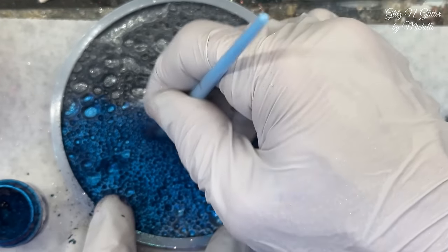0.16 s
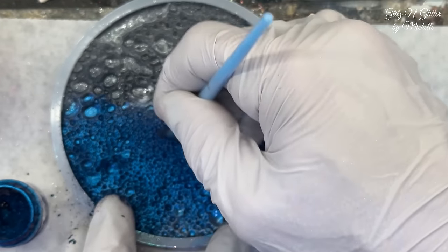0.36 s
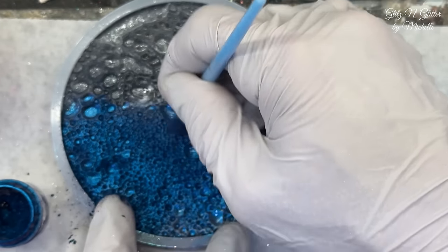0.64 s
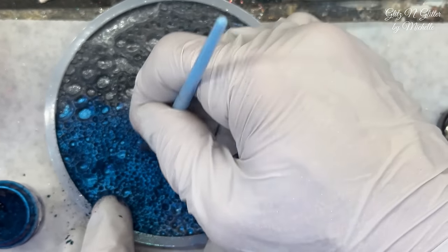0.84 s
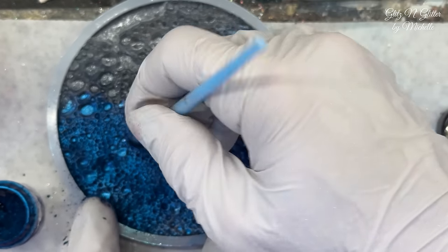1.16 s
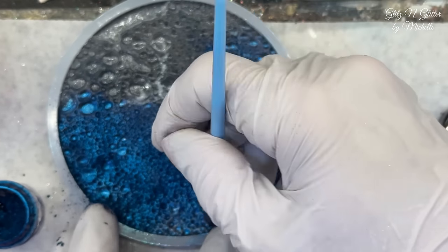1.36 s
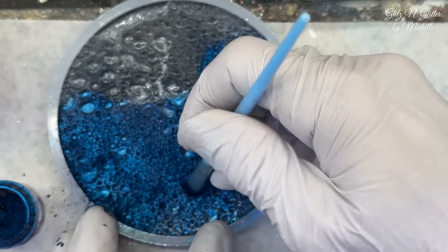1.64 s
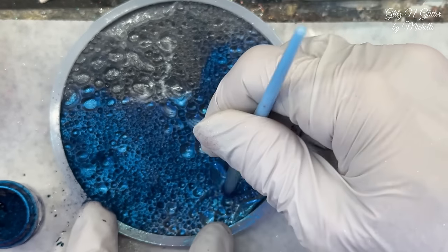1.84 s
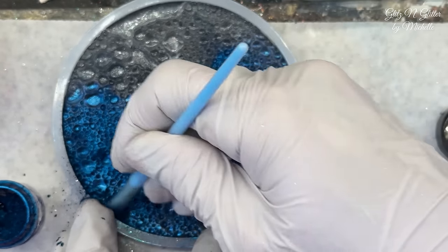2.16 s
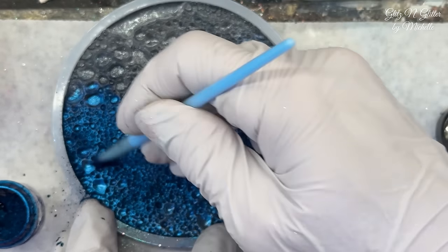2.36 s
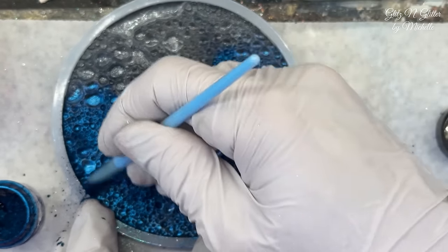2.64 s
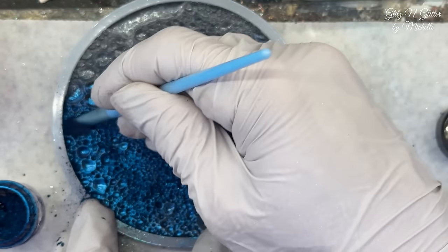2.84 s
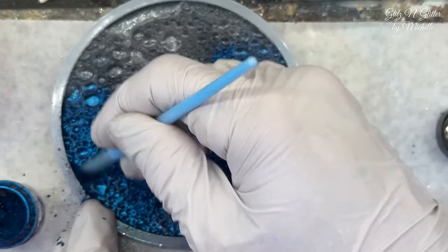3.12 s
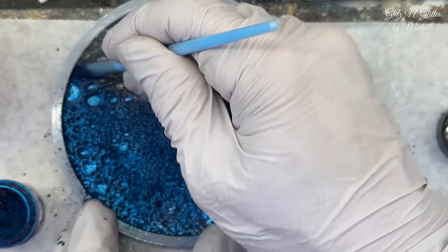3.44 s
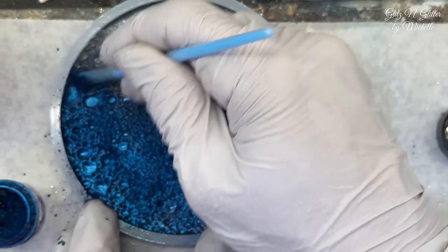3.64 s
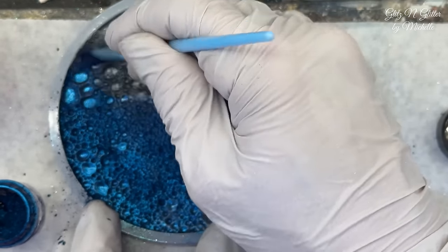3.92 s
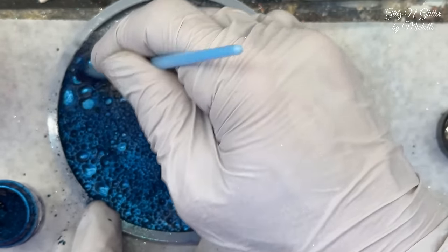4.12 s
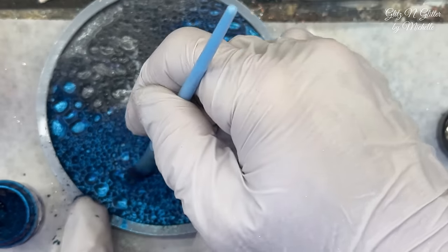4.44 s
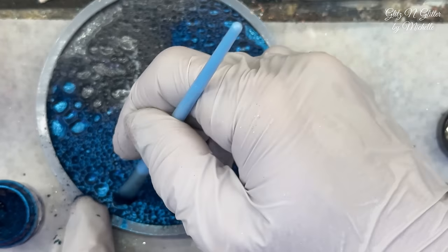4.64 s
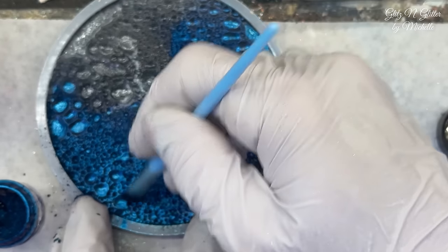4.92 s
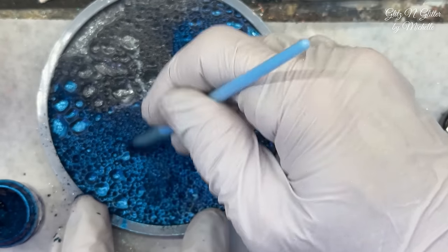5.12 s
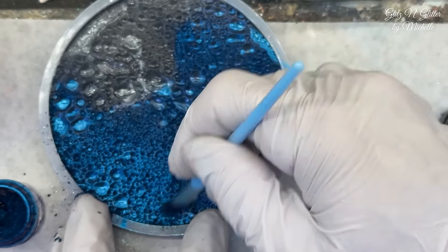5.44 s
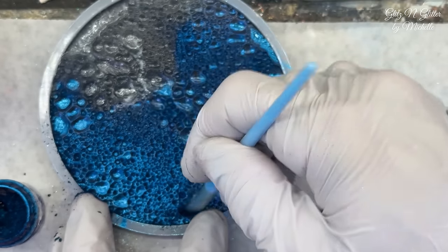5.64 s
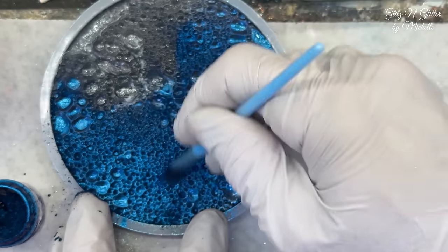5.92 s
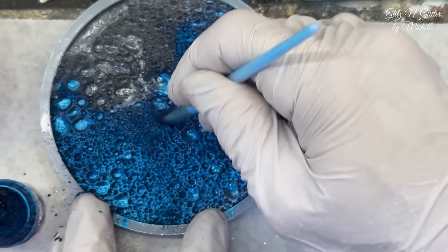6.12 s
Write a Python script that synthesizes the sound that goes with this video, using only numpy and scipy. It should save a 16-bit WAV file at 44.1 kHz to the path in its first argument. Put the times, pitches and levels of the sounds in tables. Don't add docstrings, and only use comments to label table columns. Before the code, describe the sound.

A small brush scrubs dry powder over a bumpy hard disc in quick hissing rubs, with tiny clicks, soft thumps and short pauses.

```python
import sys
import numpy as np
from scipy import signal
from scipy.fft import rfft, irfft
from scipy.io import wavfile
from scipy.ndimage import uniform_filter1d

SR = 44100
rng = np.random.default_rng(int(sys.argv[2]) if len(sys.argv) > 2 else 0)


def int16_out(signal):
    q = np.round(np.clip(np.atleast_2d(signal).T, -1, 1) * 32767)
    wavfile.write(sys.argv[1], SR, q.astype(np.int16))


def magnitude_from_level(level_db):
    exponent = np.asarray(level_db, float) / 20
    return 10 ** exponent


N = 276948


def evened(x):
    return x / np.sqrt(np.mean(x ** 2) + 1e-20)


def read(points):
    hz, value = np.transpose(points)
    return np.interp(np.log(np.fft.rfftfreq(N, 1 / SR) + 1), np.log(hz + 1), value)


def columns(rows):
    s, *values = np.transpose(rows)
    return [np.interp(np.arange(N) / SR, s, v) for v in values]


def colour(x, points):
    return evened(irfft(rfft(x) * magnitude_from_level(read(points)), N))


def ring(x, modes):
    out = 0
    for k, (hz, width_hz, db) in enumerate(modes):
        pole = np.exp((-np.pi * abs(width_hz) + 2j * np.pi * hz) / SR)
        mode = signal.lfilter([1 - abs(pole)], [1, -pole], x).real
        out = out + (-1) ** k * magnitude_from_level(db) * mode
    return evened(out)


def drift(seconds):
    size = max(int(seconds * SR), 2)
    return evened(uniform_filter1d(uniform_filter1d(rng.standard_normal(N), size), size))


def swells(start_s, length_s, peak, db, hold, curve):
    power = np.zeros(N)
    for s, span_s, top, level_db in np.broadcast(start_s, length_s, np.clip(peak, .05, .95), db):
        at = np.arange(max(round(s * SR), 0), min(round((s + span_s) * SR), N))
        u = (at / SR - s) / span_s
        effort = np.clip(hold * np.minimum(u / top, (1 - u) / (1 - top)), 0, 1)
        power[at] += (magnitude_from_level(level_db) * effort ** curve) ** 2
    return power


def ports(pair, same, lean_db=0):
    # frequency in Hz, lead of the left port in radians
    lead = [(4000, 0), (5700, -.5), (7000, -1.3), (8500, -1.9), (10200, -2.55), (11300, -3.0),
            (12600, -3.3), (13500, -3.75), (16000, -4.8)]
    likeness = np.clip(read(same), -1, 1)
    shared, opposed = rfft(pair) * np.sqrt([(1 + likeness) / 2, (1 - likeness) / 2])
    turn = np.exp(.5j * read(lead)) * magnitude_from_level(lean_db / 2)
    return irfft([(shared + opposed) * turn, (shared - opposed) / turn], N)


def room():
    # frequency in Hz, level in dB
    air_points = [(30, -32), (60, -3), (95, -17.5), (170, -5.5), (300, -12.5), (1200, -24.5), (2350, -29),
                  (3700, -31.5), (6000, -29), (8600, -58), (10600, -22.5), (13000, -32), (15700, -35)]
    # frequency in Hz, waver width in Hz, level in dB
    hum = [(58, 4, -57.5), (120.6, 0.8, -54), (6460, 3.3, -84), (12600, 30, -93.5)]
    waver_depths_db = [2.5, 1.2, 4, 2]
    air = magnitude_from_level(-64.5 + drift(0.075)) * colour(rng.standard_normal((2, N)), air_points)
    for (hz, width_hz, db), waver_db in zip(hum, waver_depths_db):
        turns = np.cumsum(hz + width_hz * drift(3 / width_hz ** .5 / 20)) / SR
        air[0] += magnitude_from_level(db + waver_db * drift(0.048)) * np.sin(2 * np.pi * turns)
    return air


def whine():
    mode = [(6465, 110, 0)]
    noise = rng.standard_normal((2, N))
    return magnitude_from_level(-74 + 3.5 * drift(0.038)) * ring(ring(noise, mode), mode)


def patchy(x, patch_db):
    z = signal.stft(x, nperseg=512, noverlap=384)[2]
    field = rng.standard_normal(z.shape[:0:-1])
    field = uniform_filter1d(uniform_filter1d(field, 4, 0), 12, 1)
    return signal.istft(z * magnitude_from_level(patch_db * evened(field).T), nperseg=512, noverlap=384)[1][:, :N]


def brush(ticks_per_s=4000, clump_db=1.5, slide=2.2):
    # start in seconds, length in seconds, share spent pressing in 0-1, contact in dB, weight
    # on the tray in dB re contact
    strokes = [(-.06, 0.18, 0.85, -42, -17), (0.098, 0.085, 0.4, -53, -7), (0.154, 0.12, 0.02, -45, -18.5),
               (0.202, 0.14, 0.51, -43, -18.5), (0.328, 0.11, 0.45, -47, -15.5), (.4, 0.12, 0.34, -49, -12),
               (0.432, 0.11, 0.63, -43, -20), (0.523, 0.12, 0.47, -45, -8.5),
               (0.62, 0.2, 0.47, -43.5, -18.5), (0.713, 0.15, 0.34, -43, -12.5),
               (0.856, 0.099, 0.7, -47, -31), (0.942, 0.22, 0.13, -47, -14), (1.07, 0.094, 0.6, -61, -28),
               (1.147, .1, 0.93, -46.5, -45), (1.237, 0.075, 0, -53, -30), (1.3, 0.11, 0.69, -49.5, -28),
               (1.392, 0.065, 0.25, -58.5, -19), (1.447, 0.14, 0.43, -55.5, -17),
               (1.593, 0.073, 0.76, -51, -24), (1.653, 0.15, 0.27, -54, -22), (1.744, 0.13, 0.68, -56, -22),
               (1.94, 0.14, 0.4, -55.5, -20), (2.011, 0.078, 0.39, -46.5, -21), (2.051, 0.19, 0.32, -45, -18),
            (2.169, 0.28, 0.058, -47.5, -21), (2.415, 0.1, 0.18, -59.5, -18),
            (2.511, 0.15, 0.59, -44.5, -25), (2.599, 0.14, 0.52, -46, -23), (2.692, 0.058, 0.44, -44, -24),
            (2.746, 0.024, 0.29, -46, -19), (2.769, 0.041, 0.71, -42, -23), (2.804, 0.065, 0.094, -46, -38),
            (2.851, 0.098, 0.26, -56, -32), (2.99, 0.047, 0.43, -58, -29), (3.07, 0.045, 0.22, -52.5, -17),
            (3.105, 0.062, 0.77, -44, -31), (3.168, 0.027, 0.6, -41, -22), (3.206, 0.12, 0.37, -45, -31),
            (3.3, 0.052, 1, -46, -20), (3.349, 0.075, 0.4, -43.5, -33), (3.452, 0.11, 0.97, -53, -28),
            (3.56, 0.072, 0.46, -53.5, -26), (3.615, 0.095, 0.81, -43.5, -36),
            (3.764, 0.081, 0.37, -43, -26), (3.845, 0.082, 0.96, -46.5, -39),
            (3.935, 0.044, 0.5, -44.5, -27), (3.956, 0.063, 0.23, -39, -35),
            (4.031, 0.079, 0.77, -44.5, -39), (4.122, 0.041, .4, -51.5, -32),
            (4.147, 0.065, 0.22, -42, -48), (4.188, 0.078, 0.2, -50.5, -33), (4.23, 0.23, 0.34, -49, -16),
            (4.361, 0.14, 0.59, -58.5, -17), (4.481, 0.057, 0.49, -61.5, -25),
               (4.676, 0.034, 0.56, -61.5, -27), (4.702, 0.11, 0.53, -43, -17),
              (4.805, 0.046, 0.33, -56.5, -27), (4.858, 0.091, 0.62, -68, -12),
              (4.96, 0.038, 0.24, -55, -23), (4.975, 0.12, 0.54, -42.5, -9),
              (5.08, 0.069, 0.11, -57.5, -28), (5.209, 0.032, 0.21, -56, -8),
              (5.22, 0.12, 0.45, -41.5, -9.5), (5.437, 0.056, 0.37, -58, -7.5),
              (5.467, 0.11, 0.44, -42, -16.5), (5.578, 0.052, 0.36, -56.5, -23),
              (5.674, 0.066, 0.23, -53.5, -2), (5.689, 0.12, 0.54, -41.5, -14),
              (5.825, 0.062, 0.3, -46, -17), (5.893, 0.052, 0.35, -54, -25),
              (5.914, 0.14, 0.5, -41.5, -18.5), (6.055, 0.082, 0.54, -40.5, -18),
              (6.148, 0.082, 0.56, -43, -32), (6.224, 0.14, 0.45, -40, -22)]
    # time in seconds, disc ring in dB, bristles laid flat in dB, both re contact
    place = [(0, -2.5, -10), (.75, -1, -6), (1.0, -11, -0.5), (1.3, -11, -5), (1.75, -7.5, 2),
             (2.1, -12, -12), (2.85, -17, -14), (3.3, -18, -12.5), (3.7, -15, -9), (4.08, -20.5, -9),
             (4.2, -3.5, -7), (4.45, -18, 4.5), (4.75, -18, -4.5), (5.05, -12.5, -7), (5.5, -9, -5.5),
             (5.85, -7, -6.5), (6.28, -9, -7.5)]
    # frequency in Hz, level in dB
    fizz = [(3000, -33.5), (7000, -13), (9000, -10), (10600, 0), (13000, -1), (15200, -0.5), (16500, -3.5)]
    # frequency in Hz, level in dB
    body = [(300, -42), (1100, -26.5), (1800, -9), (3850, -10.5), (5000, -4.5), (5800, -4.5), (8000, -9),
            (10000, -10)]
    # frequency in Hz, width in Hz, level in dB re scrape
    rim = (6690, 250, -9.5)
    # frequency in Hz, width in Hz, level in dB
    tray_modes = [(369, 27, 0.5), (555, 270, -10.5), (767, 295, 2), (973, 28, 0), (1112, 39, 2),
                  (1534, 64, 8), (1880, 670, -11.5)]
    # frequency in Hz, width in Hz, level in dB
    disc_modes = [(1549, 160, 9), (1670, 130, -1), (2380, 350, 2.5), (2817, 62, 17), (3052, 420, 0.5)]
    resting_db, trail_s, trail_db = -75, 0.045, -16.5
    press_curve = 1.2
    tick_spread_db = 4.6

    start_s, length_s, peak, db, weight_db = np.transpose(strokes)
    rubbing = swells(start_s, length_s, peak, db, 1.145, 0.61)
    keep = np.exp(-1 / (trail_s * SR))
    trailing = magnitude_from_level(2 * trail_db) * signal.lfilter([1 - keep], [1, -keep], rubbing)
    resting = magnitude_from_level(2 * resting_db)
    contact = np.sqrt(rubbing + trailing + resting)
    bearing = swells(start_s, length_s, peak, db + weight_db + 4.0, 0.79, press_curve)
    weight = np.sqrt(bearing + magnitude_from_level(2 * (resting_db - 8)))
    pressing = np.sqrt(swells(start_s, length_s, peak, db, 0.86, press_curve) + trailing + resting)

    disc_db, flat_db = columns(place)
    happens = rng.random(N) < ticks_per_s / SR
    size = magnitude_from_level(tick_spread_db * np.minimum(rng.exponential(1, N), 4.1)) * happens
    clumps = magnitude_from_level(clump_db * drift(0.0041))
    drive = evened(clumps * (slide + evened(size)) * rng.standard_normal((2, N)))

    tips = contact * magnitude_from_level(2.0) * colour(drive, fizz)
    scrape = colour(drive, body) + magnitude_from_level(rim[2]) * ring(drive, [rim])
    tray = drive * weight * magnitude_from_level(-1.0)
    disc = drive * pressing * magnitude_from_level(disc_db - 4.0)
    rings = np.std(tray) * ring(tray, tray_modes) + np.std(disc) * ring(disc, disc_modes)
    return patchy(tips + contact * magnitude_from_level(flat_db - 3.5) * scrape + rings, 2.8) + hollow(drive)


def table(steady=0.74):
    # start in seconds, length in seconds, shake in dB, upper modes in dB re shake
    pushes = [(-.024, 0.12, -43.5, -21), (0.157, 0.1, -36.5, -17), (0.23, 0.17, -45.5, -11),
              (0.371, 0.094, -38, -14), (0.487, 0.069, -48.5, -5), (0.56, 0.36, -47, -7),
              (0.843, 0.46, -54.5, -4.5), (1.49, 0.23, -54, -5), (2.142, 0.27, -53, 0.5),
              (2.519, 0.059, -49, -18), (2.606, 0.071, -42, -13), (2.685, 0.24, -44.5, -6.5),
              (3.083, 0.054, -34.5, -38), (3.14, 0.25, -39, -8), (3.276, 0.23, -45.5, -1),
              (3.637, 0.099, -39.5, -7.5), (3.81, 0.03, -38.5, -10), (3.958, 0.11, -43.5, -3),
              (4.033, 0.16, -40.5, -20), (4.152, 0.12, -38.5, -34), (4.228, 0.27, -53, -9),
              (4.69, 0.17, -50, 0), (4.966, 0.053, -44, -29), (5.023, 0.093, -54.5, 8),
              (5.205, 0.18, -45.5, -5), (5.437, 0.17, -40.5, -14.5), (5.679, 0.19, -44, -1.5),
              (5.875, 0.24, -41.5, -7.5), (5.982, 0.26, -42.5, -11.5), (6.257, 0.053, -25.5, -18)]
    # start in seconds, peak in dB, ring in Hz, t60 in seconds
    bumps = [(-.02, -6, 65.5, 0.067), (0.174, -22.5, 58, 0.19), (3.077, -41, 72.5, 0.22),
             (2.206, -36, 96, .1), (3.988, -26, 122.8, 0.17), (4.0066, -8, 65, 0.072),
             (4.174, -22, 58, 0.18), (4.968, -26, 54, 0.23), (5.218, -19, 58.6, 0.088),
             (5.683, -25.5, 70, 0.13), (6.252, -20.5, 79, 0.45)]
    # frequency in Hz, width in Hz, level in dB
    low_modes = [(58, 20.9, -0.5), (100, 33.9, -1.5), (113.9, 14.8, -6)]
    # frequency in Hz, width in Hz, level in dB
    upper_modes = [(127.4, 19.8, 7), (163, 77, -10), (204, 32, -32)]
    start_s, length_s, db, upper_db = np.transpose(pushes)
    still = magnitude_from_level(2 * -65)
    shake = np.sqrt(swells(start_s, length_s, 0.23, db - 0.5, 0.97, 0.72) + still)
    upper = np.sqrt(swells(start_s, length_s, 0.54, db + upper_db + 5.5, 0.79, 0.98) + still)
    low = ring(rng.standard_normal(N), low_modes)
    high = ring(rng.standard_normal(N), upper_modes)
    low = evened(low / uniform_filter1d(low ** 2, 1800) ** (steady / 2))
    out = shake * low + upper * high
    for s, peak_db, hz, t60_s in bumps:
        t = np.maximum(np.arange(N) / SR - s, 0)
        swing = (1 - np.exp(-t / 0.015)) * np.sin(2 * np.pi * hz * t)
        out += magnitude_from_level(peak_db - 60 * t / t60_s) * swing
    return signal.sosfilt(signal.butter(3, [38, 260], "bandpass", fs=SR, output="sos"), out)


def hollow(drive):
    # start in seconds, length in seconds, share pressing in 0-1, level in dB, ring in Hz
    loads = [(0.034, 0.094, 0.2, -58.5, 730), (0.245, 0.099, 0.14, -61.5, 750),
             (0.472, 0.087, 0.8, -50, 790), (0.56, 0.067, 0.4, -56, 750), (0.688, 0.072, 0.6, -55, 810),
             (.76, 0.094, 0.15, -56.5, 750), (2.099, 0.16, 0.13, -57.5, 857), (2.58, 0.12, 0.65, -66, 840),
             (2.695, 0.072, 0.1, -56.5, 795), (2.769, 0.046, 0.46, -59, 710), (3.33, .06, .5, -58.5, 1890),
             (3.77, .05, .4, -62, 2100), (3.96, 0.044, .4, -59, 1600), (4.137, .06, .4, -58.5, 1600),
             (.49, .12, 0.4, -55, 2100), (4.735, 0.02, 0.3, -58, 790), (4.966, 0.023, 0.25, -52, 830),
             (5.0, 0.056, 0.24, -50, 746), (5.205, 0.063, 0.3, -59, 830), (5.25, 0.043, 0.8, -50, 750),
             (5.671, 0.028, 0.3, -63, 820), (5.727, 0.056, 0.3, -58, 696), (5.953, 0.092, 0.06, -57, 710),
             (6.074, 0.073, 0.3, -61, 790)]
    out = np.zeros((2, N))
    for s, span_s, top, db, hz in loads:
        at = slice(round(s * SR), round((s + span_s) * SR))
        mode = [(hz, 233, 0)]
        load = np.sqrt(swells([s], span_s, top, db, 0.85, 1)[at])
        out[:, at] += load * ring(ring(drive[:, at], mode), mode)
    return out


def bursts(rows, trim_db, t60_s, from_hz):
    out, t = np.zeros((2, N + 1000)), np.arange(800) / SR
    noise = np.sign(rng.standard_normal((len(rows), 2, len(t)))) * [[1], [.4]]
    for (s, db), burst in zip(rows, noise):
        at = round(s * SR)
        out[:, at:at + len(t)] += magnitude_from_level(db + trim_db - 60 * t / t60_s) * burst
    return signal.lfilter(*signal.butter(2, from_hz, "highpass", fs=SR), out[:, :N])


def clicks():
    # time in seconds, peak in dB
    strikes = [(.1612, -36), (.3633, -37), (1.2123, -46), (1.6138, -36), (1.6564, -22), (2.3597, -45),
               (2.7538, -27.5), (2.7863, -41.5), (2.8112, -28.5), (3.0132, -46), (3.0442, -52),
               (3.1819, -34), (3.7820, -37.5), (3.9596, -35.5), (3.9766, -29), (4.1542, -33), (4.9440, -48),
               (4.9783, -46), (5.2397, -40), (5.4427, -52), (5.7086, -43), (5.9012, -42), (6.0713, -38),
               (6.2534, -36)]
    return bursts(strikes, 2.5, t60_s=.0022, from_hz=6500)


def knocks(hits, tick_db, crack=1.07, breadth=0.27, tick_t60_s=0.003):
    out, t = np.zeros((2, N + 4000)), np.arange(3000) / SR
    noise = rng.standard_normal((len(hits), 2, len(t)))
    for (s, db, hz, t60_s), crackle in zip(hits, noise):
        at = round(s * SR)
        body = np.sin(2 * np.pi * hz * t) + crack * ring(crackle, [(hz, breadth * hz, 0)])
        bright = magnitude_from_level(tick_db - 60 * t / tick_t60_s) * crackle
        out[:, at:at + len(t)] += magnitude_from_level(db - 10.0) * (magnitude_from_level(-60 * t / max(t60_s, .003)) * body + bright)
    return out[:, :N]


def snaps():
    # time in seconds, peak in dB, ring in Hz, t60
    # in seconds
    tufts = [(0.166, -34, 5150, 0.015), (0.4429, -41, 2860, 0.021), (1.2092, -60, 6050, 0.019),
             (1.6146, -39, 2910, 0.031), (1.6565, -41, 1910, 0.026), (1.709, -39, 6150, 0.016),
             (2.1152, -34.5, 2710, 0.015), (2.179, -43, 6500, 0.018), (2.5939, -37.5, 6360, 0.099),
             (2.753, -57, 4530, 0.016), (2.812, -56, 6460, 0.0086), (3.065, -43.5, 2420, 0.015),
             (3.1835, -40, 7140, 0.02), (3.7214, -38.5, 2280, 0.018), (3.782, -40, 5460, 0.01),
             (3.961, -34, 6060, 0.016), (3.9783, -45, 1710, 0.21), (4.136, -42, 2700, 0.065),
             (4.153, -45, 6900, 0.017), (4.181, -34.5, 6400, 0.024), (4.2966, -39.5, 4940, 0.075),
             (4.7163, -55, 6740, 0.011), (4.9428, -53, 3230, 0.035), (4.973, -45, 2660, 0.01),
             (5.2163, -47, 2760, 0.018), (5.4778, -34, 6040, 0.02), (5.678, -49, 2930, 0.017),
             (5.84, -49, 2644, 0.016), (6.0044, -31.5, 2880, 0.013), (6.0747, -33, 6460, 0.0054),
             (0.397, -40, 2760, 0.015), (0.5259, -34.5, 2740, 0.065), (0.964, -46, 2720, 0.015),
             (1.0044, -32, 5930, 0.013), (1.094, -38, 2210, 0.025), (1.2244, -37, 5900, 0.015),
             (1.2416, -38.5, 2260, 0.022), (1.5424, -40.5, 5740, 0.019), (1.729, -44, 5520, 0.015),
             (1.752, -43.5, 2000, 0.017), (1.8148, -49, 2130, 0.024), (1.9058, -49, 2350, 0.02),
             (2.0385, -41, 5810, 0.013), (2.5424, -45.5, 2440, 0.026), (2.7027, -45, 2360, 0.015),
             (2.7914, -52, 5460, 0.014), (2.862, -64, 5130, 0.011), (3.3428, -48, 1940, 0.018),
             (3.676, -50, 6070, 0.015), (5.017, -36.5, 1760, 0.027), (5.855, -47.5, 2660, 0.015),
             (5.9665, -38, 2770, 0.015), (6.101, -36.5, 2880, 0.015),
             (0.1673, -32, 5240, 0.023), (1.615, -35, 5270, 0.011), (1.618, -30, 3080, 0.013),
              (1.653, -50, 4000, 0.011), (2.7537, -49, 5040, 0.01), (2.81, -56, 5600, .02),
              (3.784, -47, 5500, .015), (4.739, -37.5, 1480, .015), (5.443, -57, 1500, 0.028),
              (4.9432, -48, 4200, .012), (6.266, -37, 450, 0.045), (6.27, -44, 1400, .03)]
    return knocks(tufts, tick_db=-28)


def flicks():
    # time in seconds, peak in dB
    releases = [(1.1343, -48), (1.1727, -36.5), (1.8774, -44), (1.903, -50), (1.944, -56), (2.1156, -49),
                (2.179, -36), (2.2802, -32.5), (2.3544, -34), (2.3586, -32), (2.3754, -40.5),
                (2.4274, -61.5), (2.452, -65), (2.4513, -60), (2.49, -46), (3.0017, -50), (3.0134, -52),
                (3.023, -48), (3.043, -59), (3.0544, -56), (3.26, -32), (3.7217, -33), (4.4234, -46),
                (4.5394, -44), (4.5484, -61.5), (4.5584, -68), (4.8184, -52), (4.8868, -52), (4.8944, -64),
                (5.0248, -29), (5.4779, -54), (5.8376, -46), (6.0045, -25), (6.0826, -37)]
    return bursts(releases, -5, t60_s=0.008, from_hz=5000)


def taps():
    # time in seconds, peak in dB, ring in Hz
    contacts = [(1.374, -54, 367), (1.697, -46.5, 450), (2.811, -48, 287), (3.983, -45.5, 285),
                (5.05, -57, 201), (5.78, -53, 197), (5.769, -59, 281), (5.976, -44.5, 335)]
    return knocks([(*row, 0.13) for row in contacts], tick_db=-30)


def scene():
    # frequency in Hz, likeness -1 to 1
    air_same = [(150, 0.83), (250, 0.32), (420, 0.25), (800, -0.66), (1200, 0.24), (1600, 1), (5000, 0.96),
                (8000, 0.6), (11000, 0.97), (13000, .97), (15000, 0.95)]
    # frequency in Hz, likeness -1 to 1
    brush_same = [(400, .6), (750, .9), (1050, .7), (1450, .995), (5000, .995), (8000, .78), (11200, .985),
                  (12800, .985), (15000, .91)]
    # frequency in Hz, left minus right in dB
    lean = [(450, 0), (750, 3.5), (1100, 1), (1400, 0)]
    background = ports(room() + whine(), air_same)
    rubbing = brush() + clicks() + snaps() + flicks() + taps()
    return background + ports(rubbing, brush_same, read(lean)) + table()


def thinned(x, size=8):
    whole_s = [.1, .123, 1.237, 1.261, 2.352, 2.491, 2.747, 3.42, 3.722, 3.908, 3.931, 4.186, 4.883]
    offset = 728
    under_other_db, under_treble_db, ragged_db, spared_db = -13.3, -16.3, 2.0, 7
    window = np.sin(np.pi * (np.arange(2048) + .5) / 2048)
    mid_side = np.pad([x[0] + x[1], x[0] - x[1]], [(0, 0), (offset, 0)])
    hz, _, z = signal.stft(mid_side, SR, window, 2048, 1024)
    bands = np.arange(len(hz)) // size
    energy = abs(z) ** 2
    power = np.add.reduceat(energy, np.arange(0, len(hz), size), axis=1)[:, bands]
    broad = np.add.reduceat(energy, np.arange(0, len(hz), 2 * size), axis=1)[:, bands // 2]
    treble = power[:, (hz > 9e3) & (hz < 15e3)].sum(0).mean(0)
    ragged = rng.standard_normal((z.shape[2], bands[-1] // 4 + 1)).T[bands // 4]
    weak = broad < magnitude_from_level(2 * (under_other_db + ragged_db * ragged)) * broad[::-1]
    weak |= (power < magnitude_from_level(2 * under_treble_db) * treble) & ((hz > 2800) & (hz < 4800))[:, None]
    attack = np.isin(np.arange(len(treble)), np.round((np.multiply(whole_s, SR) + offset) / 1024))
    spared = magnitude_from_level(spared_db) * (attack & (hz > 9e3)[:, None])
    kept = z * np.where(weak & (hz > 1350)[:, None], spared, 1)
    mid, side = signal.istft(kept, SR, window, 2048, 1024)[1][:, offset:offset + N]
    return np.array([mid + side, mid - side]) / 2


def top_cut(x):
    return signal.sosfilt(signal.butter(12, 16830, fs=SR, output="sos"), x)


def record(dry):
    lowpass = signal.firwin(2047, 15770, window=("kaiser", 9), fs=SR)
    limited = signal.oaconvolve(dry, lowpass[None], "same")
    return top_cut(thinned(limited))


dry = scene()
out = record(dry)
int16_out(out)
```